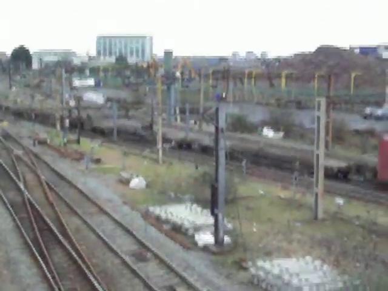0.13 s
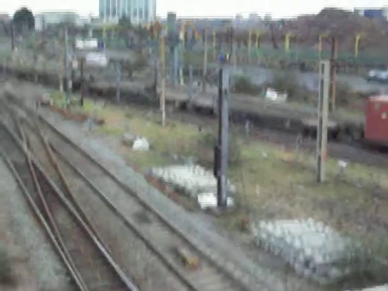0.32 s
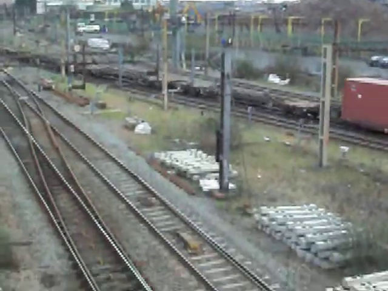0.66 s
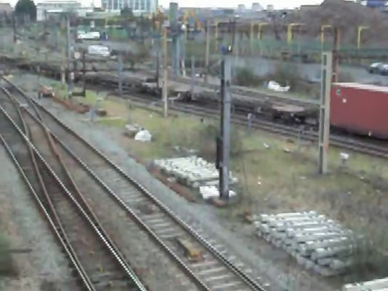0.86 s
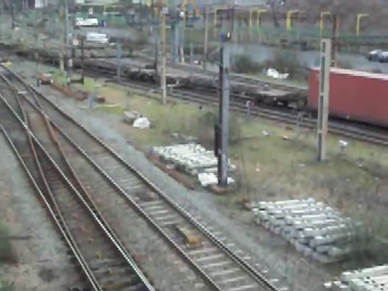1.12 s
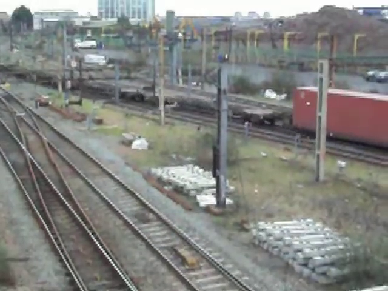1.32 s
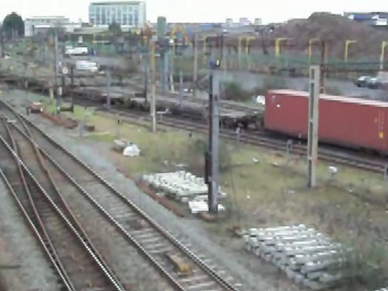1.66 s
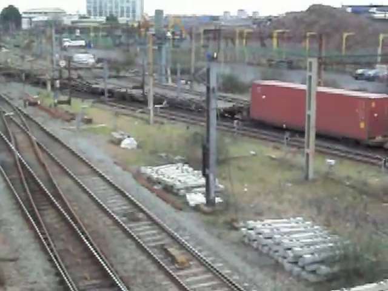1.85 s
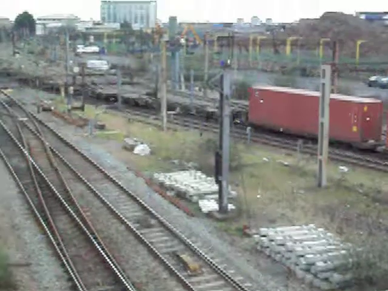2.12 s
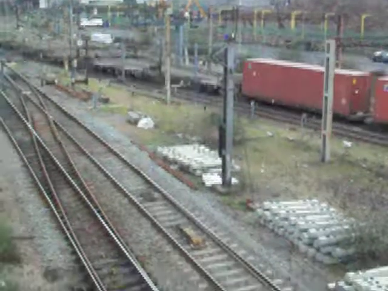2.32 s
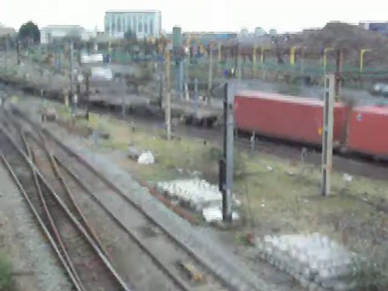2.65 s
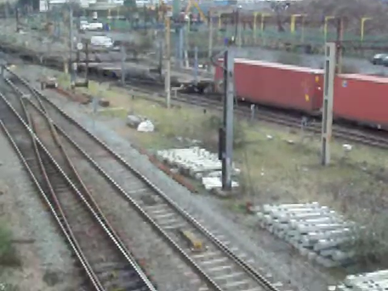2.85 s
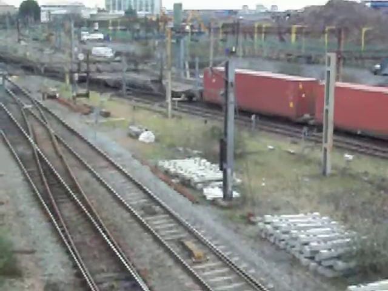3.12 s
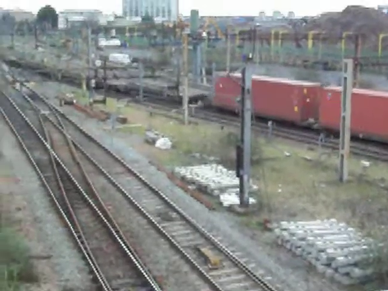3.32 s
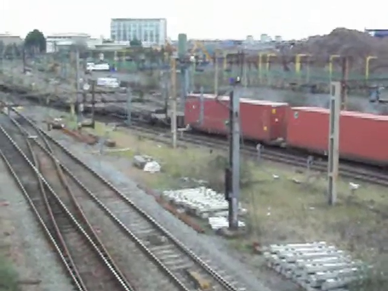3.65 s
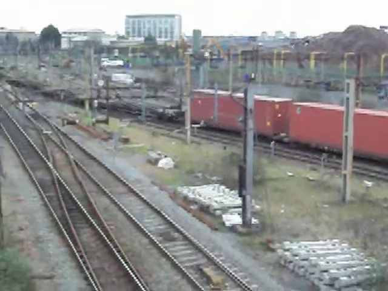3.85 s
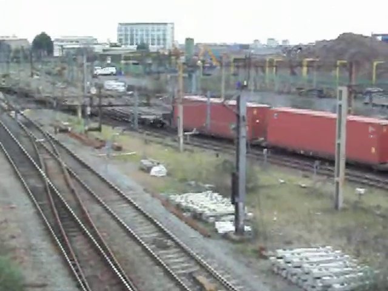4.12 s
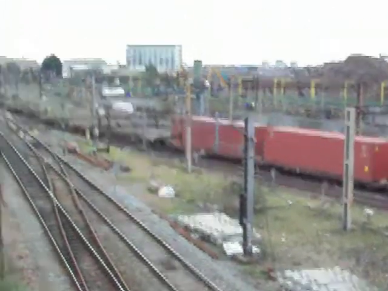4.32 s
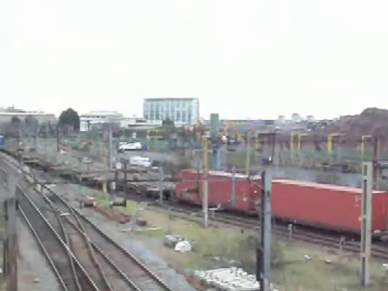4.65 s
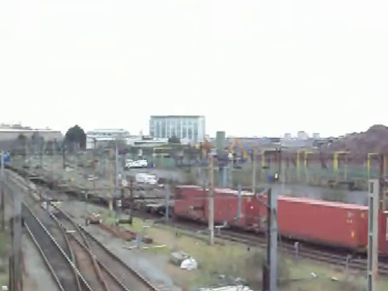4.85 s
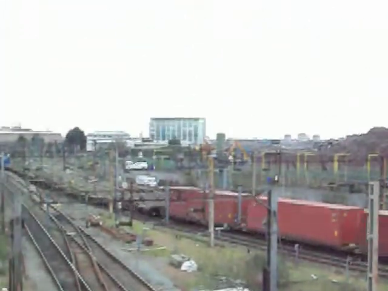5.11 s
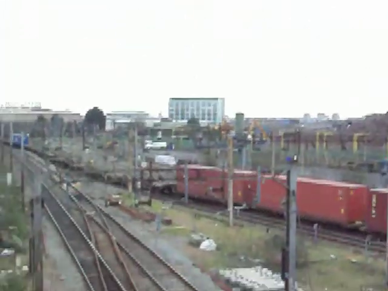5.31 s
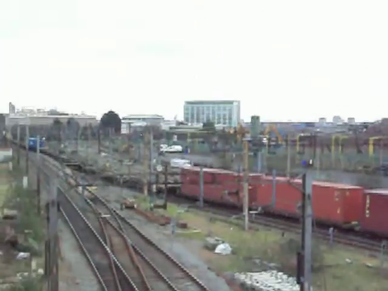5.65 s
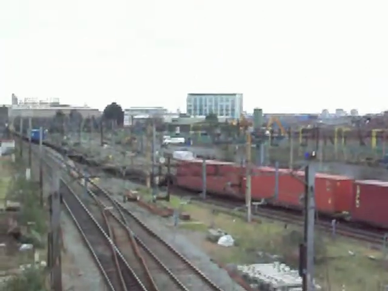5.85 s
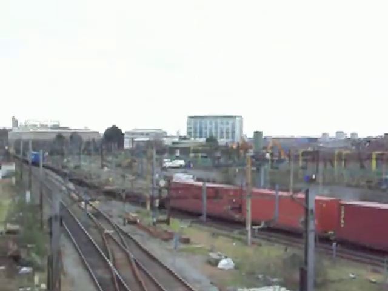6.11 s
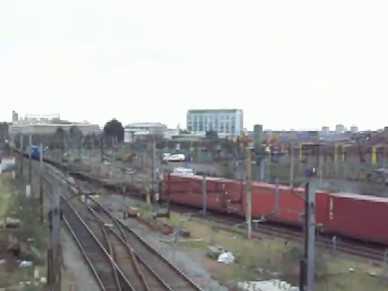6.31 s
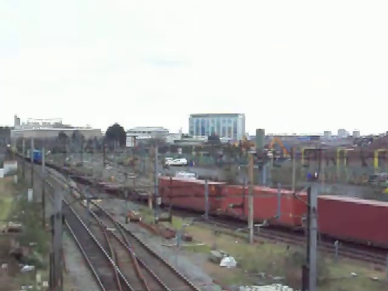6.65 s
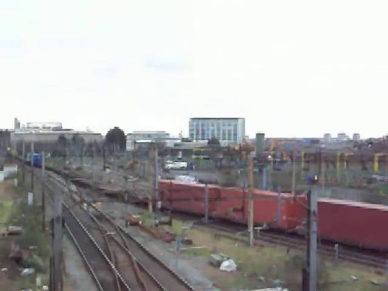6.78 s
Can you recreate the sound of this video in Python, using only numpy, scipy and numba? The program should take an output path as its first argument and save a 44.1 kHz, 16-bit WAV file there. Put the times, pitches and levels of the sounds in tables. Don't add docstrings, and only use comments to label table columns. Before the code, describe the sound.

Low freight train rumble with hissing steel wheels, irregular hard joint knocks, crackly ticks, coupling clanks, and faint flange squeals near the end.

```python
import sys
import numpy as np
from scipy import signal
from scipy.io import wavfile
from scipy.ndimage import uniform_filter1d
from numba import njit

SR = 44100
rng = np.random.default_rng(int(sys.argv[2]) if len(sys.argv) > 2 else 0)


def master_out(mix):
    frames = np.transpose(np.atleast_2d(mix))
    ceiling = np.clip(frames, -1, 1)
    pcm = np.round(ceiling * 32767).astype(np.int16)
    wavfile.write(sys.argv[1], SR, pcm)


def gain_from_decibels(decibels):
    exponent = np.asarray(decibels, float) / 20
    return 10 ** exponent


N = 306936

LIMIT_KNEE = 0.46
CONVERTER_STEP = 4


def evened(x):
    return x / np.sqrt(np.mean(x ** 2) + 1e-20)


def curve(rows, column):
    rows = np.asarray(rows)
    return np.interp(np.arange(N) / SR, rows[:, 0], rows[:, column])


def drift(hz):
    smoother = signal.butter(2, hz, fs=SR, output="sos")
    return evened(signal.sosfilt(smoother, rng.standard_normal(N)))


def noise(points, patchy_db):
    frames, hz = N // 256 + 5, np.fft.rfftfreq(1024, 1 / SR)
    real, imaginary, patches = rng.standard_normal((frames, 513, 3)).T
    patches = uniform_filter1d(patches, size=10, axis=0)
    patches = evened(uniform_filter1d(patches, size=10, axis=1))
    point_hz, point_db = np.transpose(points)
    shape_db = np.interp(np.log(hz + 1), np.log(point_hz + 1), point_db, right=-90)
    spectra = (real + 1j * imaginary) * gain_from_decibels(shape_db[:, None] + patchy_db * patches)
    return evened(signal.istft(spectra, nperseg=1024, noverlap=768)[1][:N])


def resonate(x, hz, width):
    turn = np.exp(2j * np.pi * np.cumsum(hz * np.ones(len(x))) / SR)
    r = np.exp(-np.pi * width / SR)
    return 2 * (turn * signal.lfilter([1 - r], [1, -r], x / turn)).real


# [time_s, level_db]
WAGON_LEVELS = [
    (0.0, -32),
    (1.18, -31),
    (1.41, -34.5),
    (3.88, -30),
    (4.09, -34.5),
    (4.84, -35.5),
    (5.82, -28.5),
    (6.03, -31.5),
    (6.96, -34),
]
# [time_s, swell_db, length_s]
WHEELSETS = [(0.02, 5.5, 0.19), (0.332, 7.5, 0.11), (0.59, 4.5, 0.089), (0.802, 3, 0.13),
             (1.038, 6.5, 0.22), (1.292, 2.5, 0.092), (1.64, 5.5, 0.17), (1.848, 8, 0.057),
             (2.09, 0.5, 0.42), (2.363, 5.5, .12), (2.598, 5, 0.077), (2.777, 3.5, 0.11), (3.19, 2, .1),
             (3.376, 3, 0.12), (3.643, 7.5, 0.081), (3.88, 6.5, 0.17), (4.34, 7, 0.12), (4.643, 9.5, 0.068),
             (4.932, 6.5, 0.033), (5.12, 4.5, 0.13), (5.297, 6.5, 0.067), (5.633, 6, 0.23),
             (5.835, 4, 0.13), (6.047, 0, 0.14), (6.474, 6, .18), (6.74, 2, 0.1), (6.917, 5.5, 0.26)]


def rolling(level_db, follows, swells):
    t, wagons_db = np.arange(N) / SR, curve(WAGON_LEVELS, 1)
    coarse = t[::64]
    swell_db = sum(db * np.exp(-(2 * (coarse - s) / length) ** 4) for s, db, length in WHEELSETS)
    wagon_part_db = follows * (wagons_db - wagons_db.mean())
    return gain_from_decibels(level_db + wagon_part_db + swells * np.interp(t, coarse, swell_db))


# [pitch_hz, level_db]
RUMBLE_SPECTRUM = [(12, -34.5), (20, -1), (65, 3.5), (124, -6.5), (157, -3.5), (280, -3.5), (455, -15),
                   (489, -12.5), (728, -14), (841, -19.5), (938, -19.5), (1120, -28), (1500, -29),
                   (1950, -55.5), (3300, -120)]


def rumble():
    return rolling(-12.5, follows=0.38, swells=0.099) * noise(RUMBLE_SPECTRUM, patchy_db=1.68)


# [pitch_hz, level_db]
HISS_SPECTRUM = [(530, -24), (900, 1), (1140, -11.5), (1480, -18), (1610, -6), (1770, -12), (2850, -6.5),
                 (3360, -15.5), (3880, -22), (4250, -34.5), (4690, -22.5), (5500, -13.5), (7150, -50),
                 (12100, -120)]
# [pitch_hz, width_hz, level_db]
WHEEL_MODES = [
    (2350, 340, -1),
    (2662, 120, -2),
    (2880, 210, 0),
    (3800, 250, -7),
    (4800, 420, -10.5),
]


def wheels():
    ring = np.zeros(N)
    for hz, width, db in WHEEL_MODES:
        flare_db = 2.3 * drift(25)
        ring += gain_from_decibels(db + flare_db) * evened(resonate(rng.standard_normal(N), hz, width))
    hiss = noise(HISS_SPECTRUM, patchy_db=1.4)
    fizz = signal.sosfiltfilt(signal.butter(2, 3100, "high", fs=SR, output="sos"), hiss)
    tread = rolling(-31, follows=0.26, swells=0.3) * (hiss - fizz)
    tread += rolling(-32, follows=0.7, swells=0.79) * fizz
    ringing = rolling(-31.5, follows=1, swells=0.89) * evened(ring)
    return gain_from_decibels(0.91 * drift(60)) * (tread + ringing)


# [time_s, push_or_pull (1 or -1), strength (4 to 24, 0.28 dB a unit)]
JOINT_KNOCKS = [(0.6711, -1, 4), (1.0861, 1, 16), (1.2056, -1, 10), (1.3241, 1, 6.1), (1.513, -1, 10),
                (1.5624, -1, 6.5), (1.8616, -1, 8.8), (1.943, 1, 19), (2.272, -1, 21), (2.8075, 1, 7.7),
                (2.8224, -1, 21), (2.9915, 1, 6.9), (3.5137, 1, 5), (3.588, 1, 8.7), (3.7187, -1, 15),
                (3.9644, -1, 5.3), (4.1595, 1, 4.2), (4.1868, -1, 7.9), (4.2986, 1, 16), (4.7146, -1, 4.6),
                (4.7892, -1, 24), (4.8268, -1, 14), (4.946, 1, 7.3), (5.0969, 1, 16), (5.3562, -1, 20),
                (5.3939, -1, 11), (5.4439, 1, 8.5), (5.7327, -1, 23), (6.0766, 1, 5.7), (6.2901, 1, 10)]
# [time_s, converter steps between first and last wrapped sample, strength
# (-18.5 to 14.5, 0.28 dB a unit), height of the samples beside the wrap (0-1)]
WRAPPED_KNOCKS = [(0.24066, 2, 8, .67), (0.75676, 0, 9.5, .61), (1.35222, 0, 11, .68),
                  (1.38043, 0, 14.5, .6), (1.43077, 3, 10.5, .7), (1.812, 2, 12.5, .62),
                  (2.18714, 2, -18.5, .4), (2.46524, 0, 4.5, .6), (2.66025, 0, 5.5, .68),
                  (4.24029, 0, 11.5, .7), (4.50995, 1, 8, .64), (4.99766, 2, 9, .64),
                  (6.21317, 0, 0.5, .62), (6.39558, 0, 3.5, .53), (6.70306, 1, 6, .69),
                  (6.81807, 0, 7.5, .65), (6.92665, 1, 10, .62)]


def knocked(bed):
    hard = [(s + steps * CONVERTER_STEP / SR / 2, 1, strength) for s, steps, strength, _ in WRAPPED_KNOCKS]
    t, push, cover = np.arange(-200, 200) / SR, np.zeros(N), np.zeros(N)
    for s, way, strength in list(JOINT_KNOCKS) + hard:
        at = slice(round(s * SR) - 200, round(s * SR) + 200)
        peak = LIMIT_KNEE * gain_from_decibels(2 + 0.28 * strength)
        push[at] += np.sign(way) * peak * np.exp(-(t / 0.00072) ** 2)
        cover[at] += 0.9 * np.exp(-(t / 0.0013) ** 2)
    return bed * (1 - np.clip(cover, 0, 1)) + push


def struck(blows, t60_s):
    out, t = np.zeros(N), np.arange(1500) / SR
    for s, db, hz in blows:
        rattle = evened(resonate(rng.standard_normal(1500), hz, 430))
        ring = np.sin(2 * np.pi * hz * t) + 0.52 * rattle
        rise = np.minimum(t * hz / 0.6, 1)
        out[round(s * SR):][:1500] += gain_from_decibels(db + 3.5 - 60 * t / t60_s) * ring * rise
    return out


# [time_s, peak_db, ring_hz]
LOOSE_JOLTS = [(0.458, -28, 729), (0.924, -12.5, 686), (1.035, -15, 2720), (1.452, -22, 614),
               (1.481, -15.5, 890), (1.5595, -9, 705), (1.6908, -13, 528), (3.006, -20, 659),
               (4.776, -8.5, 715), (5.574, -11.5, 579), (6.186, -15, 610)]


def jolts():
    return struck(LOOSE_JOLTS, t60_s=0.023)


# [time_s, peak_db, ring_hz]
COUPLING_CLANKS = [(2.143, -16, 2100), (2.1432, -28, 4800), (2.1865, -4, 1150), (2.1876, -4, 3690),
                   (2.1878, -6, 2100), (2.188, -7, 2950), (2.1882, -7, 1200), (2.584, -10, 1040),
                   (2.5842, -12, 1600), (2.5843, -23, 3800), (2.6015, -21, 3770), (2.6024, -19, 2930),
                   (3.8496, -20, 2730), (6.452, -27, 3470)]


def clanks():
    return struck(COUPLING_CLANKS, t60_s=0.027)


# [start_s, length_s, upper_mode_db, upper_mode_hz, lower_mode_db]
FLANGE_RUBS = [
    (6.3, .07, -31, 2890, -35),
    (6.41, .11, -28, 2940, -30),
    (6.515, .11, -24, 2880, -28),
    (6.66, .08, -33, 2920, -38),
    (6.755, .07, -31, 2930, -30),
    (6.857, .1, -24, 2910, -46),
]


def squeal():
    t = np.arange(N) / SR
    low, high, high_hz = np.zeros(N), np.zeros(N), np.full(N, float(FLANGE_RUBS[0][3]))
    for start, length, high_db, hz, low_db in FLANGE_RUBS:
        since = np.clip(t - start, 0, length)
        ends = np.clip(np.minimum(since, length - since) / 0.012, 0, 1)
        rub = ends * gain_from_decibels(-12 * (since / length) ** 2)
        rest = gain_from_decibels(-54) * (t > start)
        low += gain_from_decibels(low_db) * rub + rest
        high += gain_from_decibels(high_db) * rub + rest
        high_hz = np.where(t > start, hz + 700 * since, high_hz)
    modes = [(2415, low), (high_hz, high), (3990, low * gain_from_decibels(-15)), (4690, high * gain_from_decibels(-20.5))]
    out = np.zeros(N)
    for hz, gain in modes:
        flutter = gain_from_decibels(0.2 + 2.8 * drift(60))
        whistle = np.sin(2 * np.pi * np.cumsum(hz + 34 * drift(45)) / SR)
        out += gain * flutter * np.sqrt(2) * whistle
    return out


def scene():
    train = knocked(rumble() + wheels() + squeal())
    return (train + jolts() + clanks())[None]


@njit
def limited(x, knee, bite_db, release, lag):
    out, charge_db, cut_db = np.empty_like(x), 0., 0.
    for i in range(len(x)):
        out[i] = x[i] * 10 ** (-cut_db / 20)
        over = max(min(abs(out[i]), 1.7 * knee) - knee, 0.)
        charge_db = charge_db * release + bite_db * over
        cut_db += lag * (charge_db - cut_db)
    return out


def converted(x):
    full, out_full = 0.655, 0.7
    smooth = signal.firwin(65, 5500, window=("kaiser", 8), fs=SR)
    slow = np.clip(signal.oaconvolve(x, smooth, "same")[1::CONVERTER_STEP], -full, full)
    for s, steps, _, shoulder in WRAPPED_KNOCKS:
        first = round((s * SR - 1) / CONVERTER_STEP)
        last = first + round(steps)
        slow[[first - 1, last + 1]] = shoulder
        slow[[first, last]] = -out_full
    stuffed = np.zeros(N)
    stuffed[1::CONVERTER_STEP] = CONVERTER_STEP * slow
    rebuild = signal.firwin(129, 5512, window=("kaiser", 9), fs=SR)
    fast = signal.oaconvolve(stuffed, rebuild, "same")
    edge = signal.firwin(255, 16500, window=("kaiser", 9), fs=SR)
    return signal.oaconvolve(np.clip(fast + 0.0035, -out_full, out_full), edge, "same")


def top_cut(x):
    return signal.sosfilt(signal.butter(12, 16500, fs=SR, output="sos"), x)


def record(dry):
    release, lag = np.exp(-1 / (0.012 * SR)), 1 / (0.0012 * SR)
    ducked = limited(dry[0], LIMIT_KNEE, 1.3e5 / SR, release, lag)
    return top_cut(converted(ducked)[None])


dry = scene()
out = record(dry)
master_out(out)
```